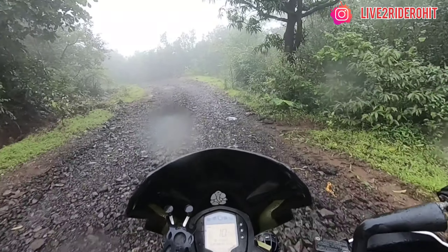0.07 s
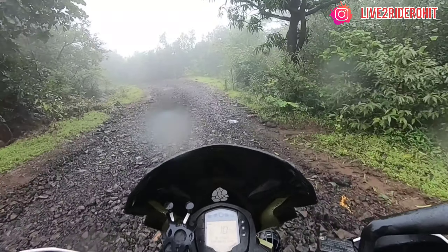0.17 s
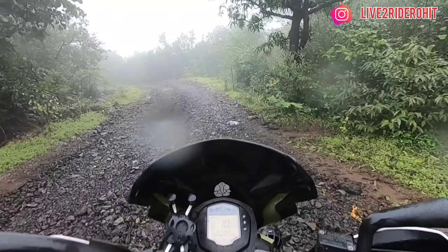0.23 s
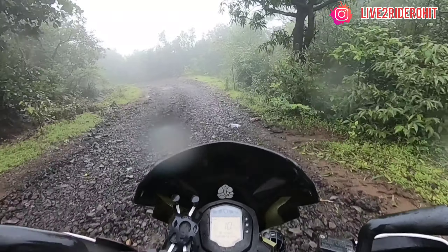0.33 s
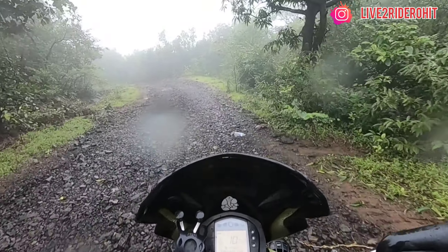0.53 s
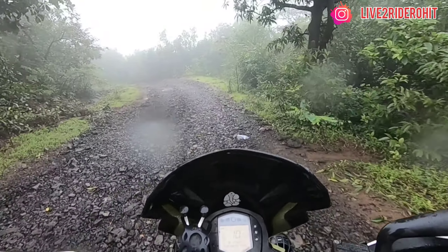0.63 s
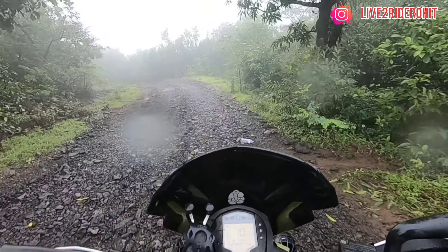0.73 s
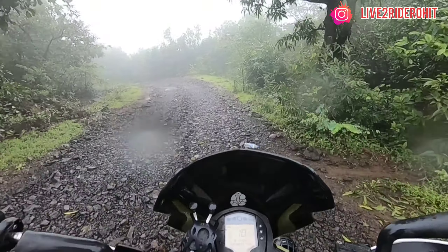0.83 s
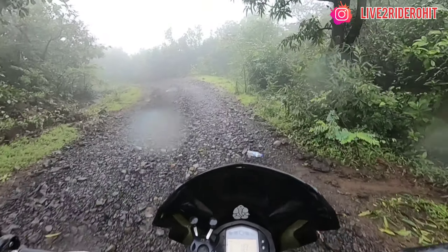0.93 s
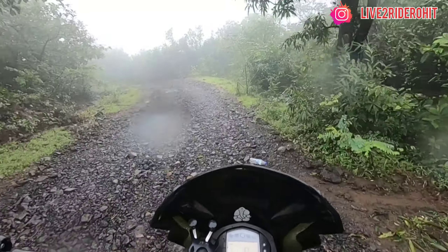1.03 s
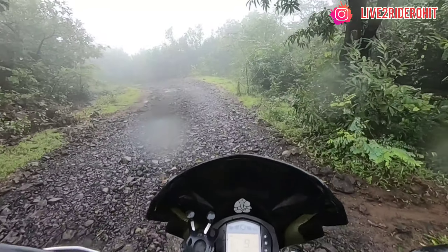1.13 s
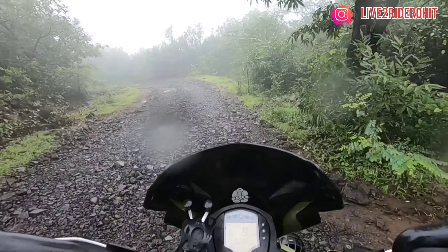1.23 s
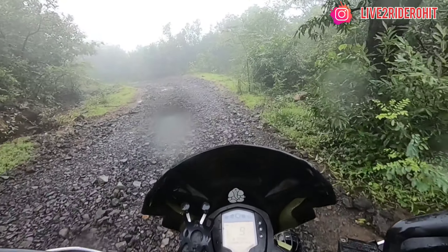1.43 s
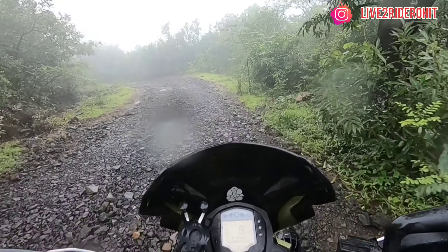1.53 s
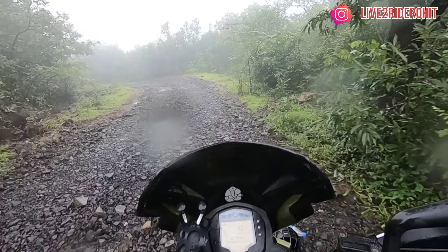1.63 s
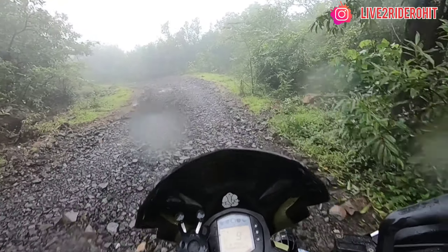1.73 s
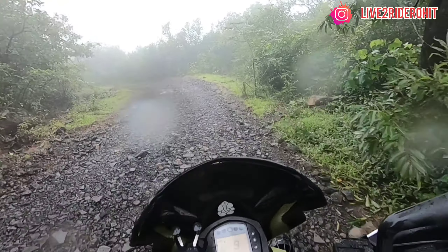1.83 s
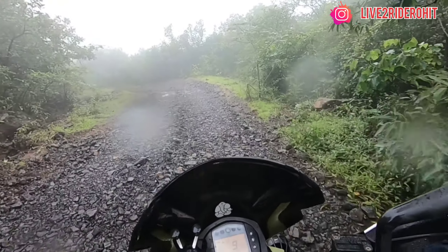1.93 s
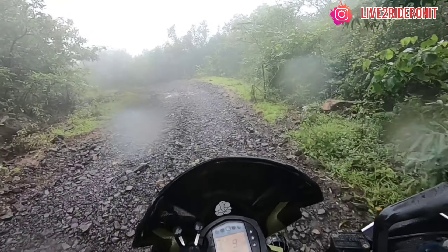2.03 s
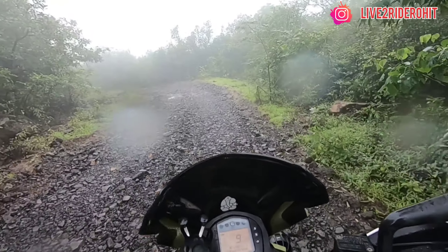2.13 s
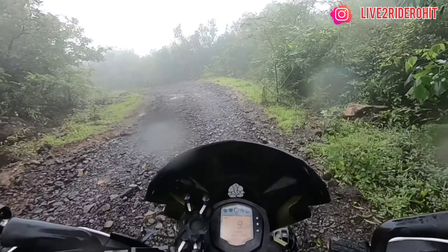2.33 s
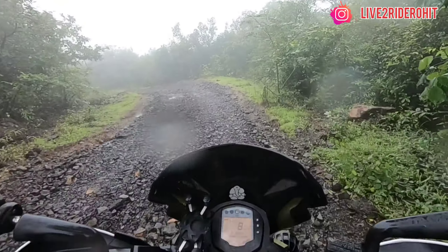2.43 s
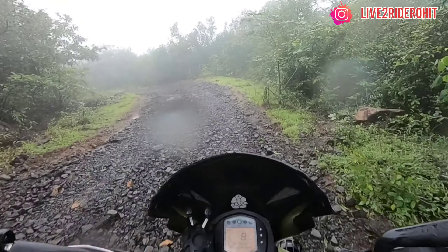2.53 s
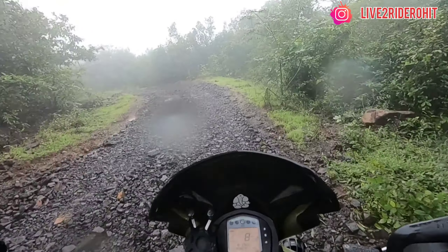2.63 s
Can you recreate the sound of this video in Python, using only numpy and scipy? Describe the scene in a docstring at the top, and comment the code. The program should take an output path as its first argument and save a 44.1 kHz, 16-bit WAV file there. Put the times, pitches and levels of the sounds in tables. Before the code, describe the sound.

Slow motorcycle thumping and clattering across crunching gravel, a short dropout, then a raspy idle that revs up while a louder, deeper single booms nearby.

```python
"""Wet loose stones, from the rider's seat of a single-cylinder motorcycle crawling along.
Each firing knocks, then thumps through the exhaust as a filtered impulse; shaped noise makes gas and valve clatter.
A gear whines in swaying sines, the chain clicks, stones strike the wheels and the engine ticks a few times.
The sound cuts out briefly and returns at a standstill: the engine idles with a metallic rasp, then revs up,
while a second, heavier single booms close by at its own pace."""
import sys
import numpy as np
from scipy import signal
from scipy.fft import rfft, irfft, next_fast_len
from scipy.io import wavfile
from scipy.ndimage import uniform_filter1d, minimum_filter1d, map_coordinates

SR = 44100
rng = np.random.default_rng(int(sys.argv[2]) if len(sys.argv) > 2 else 0)


def unload_wav(signal):
    """Save mono or channel-first audio to the path in sys.argv[1] as 16-bit WAV at rate SR, clipped to [-1, 1]."""
    wavfile.write(
        sys.argv[1],
        SR,
        np.round(np.clip(np.atleast_2d(signal).T, -1, 1) * 32767).astype(np.int16),
    )


N = 268260
TIME = np.arange(N) / SR  # s

# Engine speed rolling, idling, and of the heavier engine. Each row: time in seconds, firings per second.
ROLL_RATE = [(0.0, 17.77), (0.298, 17.21), (0.565, 15.76), (1.025, 18.7), (1.288, 17.26), (1.494, 18.04),
             (1.716, 17.06), (2.503, 16.68), (2.748, 19.1), (3.07, 19.55), (3.391, 16.08), (3.622, 13.15),
             (3.963, 20.99), (4.086, 23.23), (4.259, 20.04), (4.42, 25.11)]
IDLE_RATE = [(4.62, 12.3), (4.8, 12.3), (4.87, 13.71), (5.3, 14.81), (5.68, 13.88), (5.95, 19.58),
             (6.08, 24.12)]
BOOM_RATE = [(4.62, 12.87), (4.97, 12.53), (5.25, 17.71), (5.48, 17.8), (5.78, 14.49), (6.08, 15.63)]
# How hard the throttle works the engine while rolling. Each row: time in seconds, effort in dB.
ROLL_EFFORT = [(0, -1), (.55, -9.5), (1.2, -8.5), (1.42, -2), (1.7, 2.5), (1.97, -4), (2.25, 1), (2.55, -3),
               (2.88, 1.5), (3.15, -2.5), (3.4, 5), (3.8, -2), (4.05, 1.5), (4.4, 0.5)]
# Throttle at a standstill. Each row: time in seconds, effort in dB, exhaust level in dB.
IDLE_DRIVE = [(4.62, -6.5, 2.5), (5.3, -4.5, 5), (5.65, -4, 5), (5.8, -6, 8.5), (6.08, -5.5, 9.5)]
# Pipe echo as the engine labours while rolling. Each row: time in seconds, level in dB.
ROLL_LABOUR = [(0, -35.5), (1.35, -46), (1.7, -34), (2.05, -40), (3.1, -43), (3.38, -26.5), (3.66, -27),
               (3.85, -33.5), (4.4, -39)]
# Gear whine rolling and at a standstill. Each row: time in seconds, level in dB.
ROLL_WHINE = [(0, -53), (.3, -44.5), (.55, -54.5), (1.0, -44.5), (1.6, -41), (1.95, -44), (2.35, -40),
              (3.3, -40), (3.6, -40.5), (4.1, -47.5), (4.4, -38)]
IDLE_WHINE = [(4.62, -49.5), (5.7, -46.5), (5.97, -38), (6.08, -36)]
# Gear mesh tone at a standstill. Each row: time in seconds, pitch in Hz.
IDLE_PITCH = [(4.62, 1003), (5.8, 1100), (5.97, 1304), (6.08, 1294)]
# Drive chain, and the chassis rumbling over the track. Each row: time in seconds, level in dB.
CHAIN_LEVEL = [(0, -58), (.6, -57), (1.1, -53), (1.55, -48.5), (2.05, -56.5), (2.5, -52), (2.9, -48.5),
               (3.35, -54), (4.4, -56.5)]
RUMBLE_LEVEL = [(0, -27.5), (.3, -25.5), (.5, -29.5), (.82, -27), (1.4, -30), (1.75, -26), (2.1, -29.5),
                (3.0, -27), (3.6, -28.5), (4.0, -30.5), (4.4, -31)]
# Looseness of the track under the tyres. Each row: time in seconds, change of the grinding in dB.
GROUND = [(0, 5), (.33, -2.5), (.5, -8), (1.3, -4), (1.65, 4), (1.95, -4), (2.4, 3.5), (3.05, -4.5),
          (3.55, 5), (3.85, 3.5), (4.07, 5.5), (4.4, 3)]
# Stones striking the wheels; from 3.45 to 3.65 s also short engine ticks.
# Each row: time in seconds, relative blow in dB, relative clack in dB.
STRIKES = [(0.150, -15.5, -41), (0.227, -11, -44), (0.248, -16, -41), (0.305, -15.5, -50), (0.367, -9, -33),
           (0.380, -12, -31), (0.667, -16.5, -43), (0.677, -7.5, -30.5), (0.776, -10, -46),
           (0.794, -13, -39.5), (0.820, -17, -55), (1.178, -16, -55), (1.572, -23.5, -27),
           (2.836, -15, -51), (3.044, -15.5, -58), (3.452, -14, -38), (3.522, -26.5, -35),
           (3.576, -12.5, -53), (3.590, -19.5, -33), (3.621, -9, -43), (3.641, -13.5, -46),
           (3.653, -13.5, -36), (4.047, -11, -40.5), (4.067, -10, -33), (4.08, -17.5, -32.5)]
# Strength of the heavier engine. Each row: time in seconds, level in dB.
BOOM_LEVEL = [(4.62, -4), (4.85, -10), (5.2, -9.5), (6.08, -9)]

# Tone of one exhaust pulse: the rider's engine, the heavier one. Each row: frequency in Hz, gain in dB.
ROLL_PIPE = [(18, -28.5), (32, -1.5), (48, -19), (70, 3), (90, 0.5), (120, -1), (165, 0.5), (215, -14.5),
             (260, -16), (400, -25.5), (600, -42.5), (800, -56), (2000, -81)]
BOOM_PIPE = [(18, -32.5), (40, -19), (60, -7.5), (85, -0.5), (122, 0.8), (165, -3), (230, -18.5),
             (320, -27.5), (600, -78), (1200, -100.5)]
# Ring of the silencer. Each row: frequency in Hz, gain in dB.
PIPE_RING = [(120, -28), (240, -11), (310, -10), (390, -1), (455, 2), (495, -13.5), (545, -9), (620, -25),
             (900, -38.5), (3000, -75.5)]
# Turbulent gas after the pulse: the rider's engine, the heavier one. Each row: frequency in Hz, gain in dB.
BARK = [(120, -22.5), (200, 3.5), (320, 2.5), (400, 5), (480, 5), (570, 0.5), (660, -16.5), (900, -25),
        (1500, -35), (3000, -74)]
BOOM_BARK = [(120, -16.5), (220, -1.5), (300, -6), (400, -3.5), (480, -12), (570, -13), (700, -24),
             (1000, -26), (3000, -62.5)]
# Low rumble of the chassis and of the heavier engine's gas. Each row: frequency in Hz, gain in dB.
RUMBLE = [(12, -12), (27, 5), (45, 16), (70, 11.5), (110, 9.5), (160, 8), (210, 7), (320, -13), (700, -69)]
# Outlet of both hollow tones. Each row: frequency in Hz, gain in dB.
MUFFLE = [(15, -12.5), (40, -2.5), (200, 1.5), (400, -18.5), (1200, -59)]
# Combustion knock through the cylinder. Each row: frequency in Hz, gain in dB.
KNOCK = [(400, -22), (900, -1.5), (1450, 9.5), (2000, 1.5), (2500, -2), (3100, -1), (4000, -8),
         (5000, -7.5), (5700, -26), (15000, -50)]
# Engine casing while rolling and while idling. Each row: frequency in Hz, gain in dB.
ROLL_CASE = [(400, -26), (750, 0.5), (1300, 7), (1600, 0.5), (1900, -0.5), (2500, -0.5), (3050, 1.5),
             (3800, -2.5), (5100, -3.5), (5700, -16.5), (7300, -26.5), (10000, -34), (15000, -36)]
IDLE_CASE = [(400, -11), (750, 11), (1350, 7.5), (1800, 5.5), (2200, 2.5), (2800, 5), (3500, 2.5),
             (4550, 2), (5100, -17.5), (6100, -12), (7500, -21.5), (10000, -31), (15000, -44.5)]
# Low body of a strike, and its bright clack. Each row: frequency in Hz, gain in dB.
FRAME = [(25, -13.5), (70, 1.5), (140, 5), (250, -1), (420, -10), (600, -26.5), (1200, -47), (5000, -99)]
CLACK = [(200, -10), (550, 5.5), (850, -3.5), (1400, -10.5), (2000, -25), (2500, -32.5), (5000, -25.5),
         (6000, -43.5), (12000, -70)]
# Final tone of the silencer's song, the rasp, the gears and the chain. Each row: frequency in Hz, gain in dB.
SING_TONE = [(150, -22.5), (380, -2.0), (480, 0.0), (560, -7), (700, -26), (3000, -61.5)]
RASP_TONE = [(400, -2), (800, -0.5), (4600, 1.5), (5300, -17.5), (9000, -35.5)]
GEAR_TONE = [(500, -13), (950, 3.5), (1600, -2.5), (2500, -8.0), (7000, -41.5)]
CHAIN_TONE = [(500, -13.5), (1400, 2.5), (5150, -1.5), (5600, -20), (8000, -23.5), (15000, -29)]

# Silencer modes that outlast the thump. Each row: frequency in Hz, width in Hz, relative level in dB.
SILENCER = [(404, 32, -8.5), (450.4, 18.4, 5), (536, 44, -10.5)]
# Airbox hum between firings, and the pipe's echo. Each row: frequency in Hz, width in Hz, relative level in dB.
AIRBOX = [(69.5, 12, 0)]
PIPE_ECHO = [(145, 50, 0)]
# Metallic rasp at idle. Each row: frequency in Hz, width in Hz, relative level in dB.
RASP_MODES = [(900, 120, 4.5), (1840, 190, 1.5), (2720, 290, 3), (4470, 500, -3)]
# Gearbox driven by the mesh, and shaken by loose teeth.
# Each row: frequency in Hz, width in Hz, relative level in dB.
GEARBOX = [(1060, 60, 0.5), (1168, 18, 5), (1310, 18, -4.5), (1534, 80, -19)]
GEAR_RATTLE = [(1038, 76, -0.5), (1180, 74, 0), (1340, 81, -8)]
# Ring of the chain's links. Each row: frequency in Hz, width in Hz, relative level in dB.
CHAIN = [(1603, 60, -2), (2140, 160, -6), (3095, 230, -2), (4685, 570, -3.5)]

ROLL_FIRST, IDLE_FIRST, BOOM_FIRST = 0.025, 4.704, 4.682  # first firing of each (s)
CUT, RETURN, FULL = 4.425, 4.62, 4.695  # silence begins, sound returns, full level (s)
CRUISE_RATE = 16.03  # firings per s at which the levels below hold

# Exhaust layers: level at zero effort (dB), and dB gained per dB of effort
THUMP_DB, THUMP_GROWS = -25, 0.23
RING_DB, RING_GROWS = -36.5, 0.66
SING_DB, SING_GROWS = -35.5, 1.58
BARK_DB, BARK_GROWS = -37, 0.46
AIRBOX_DB, AIRBOX_GROWS = -31.5, 0.58
THUMP_SAG_DB, AIRBOX_SAG_DB = 0.5, 1.2  # dB lost per extra firing a second
RING_LEAD = 0.03935  # cycles by which the silencer ring's impulses are advanced
RING_BEND_S = 0.00035  # depth of the delay sway that bends the silencer's pitch
PIPE_ECHO_S = 0.0075  # round trip along the pipe
IDLE_LABOUR_DB = -33.5  # pipe echo at a standstill, before the exhaust level

# Valve clatter: level (dB), dB per dB of effort (rolling only), dB per extra firing a second
CLATTER_DB, CLATTER_GROWS, CLATTER_RISE_DB = -44, 0.12, 0.3
IDLE_CLATTER_DB, IDLE_CLATTER_RISE_DB = -39, 0.52
ROLL_KNOCK_DB, IDLE_KNOCK_DB = -50, -47.5
KNOCK_LUG_DB = 0.5  # dB gained per firing a second lost, rolling only
RASP_DB, RASP_UNTIL_S, RASP_FADE_DB_PER_S = -37, 5.05, 56  # the rasp holds for a moment, then dies
RASP_CLATTER_DB, RASP_KNOCK_DB = 3, 3  # extra clatter and knock while it rasps
MESH_PER_FIRING, MESH_TOP_HZ = 61.5, 1212  # the rolling gear tone follows engine speed up to this pitch
SECOND_MESH, SECOND_MESH_DB = 0.96, -16  # second gear pair: pitch ratio, level against the first (dB)
GEAR_DIRECT_DB = 3  # gear tone that bypasses the gearbox, against the resonant share

SCRUB_DB = -42.5  # tyres grinding stones on average ground
BOOM_RUMBLE_DB, BOOM_BARK_DB = -14, -21  # the heavier engine's gas, against its boom
TOP_HZ = 15700  # band limit


def amp(db):
    """Decibels to gain."""
    return 10 ** (np.asarray(db) / 20)


def unit(x):
    """Scale to rms 1 over the time in which it sounds."""
    sounding = uniform_filter1d(np.abs(x), size=4410) > np.abs(x).max() / 1000
    return x / np.sqrt(np.mean(x[sounding] ** 2) + 1e-20)


def curves(rows):
    """One value per sample for each column after the time."""
    s, *cols = np.transpose(rows)
    return [np.interp(TIME, s, c) for c in cols]


def wobble(rate):
    """A smooth random curve, rate knots a second."""
    knots = rng.standard_normal(int(N * rate / SR) + 4)
    return map_coordinates(knots, [TIME * rate])


def noise():
    """Fresh white noise."""
    return rng.standard_normal(N)


def colour(x, points):
    """Causal, minimum-phase filter whose gain follows (Hz, dB) points."""
    size = 2 * next_fast_len(N // 2 + SR // 4)
    hz, db = np.transpose(points)
    gain = amp(np.interp(np.log(np.fft.rfftfreq(size, 1 / SR) + 1), np.log(hz), db))
    # folding the cepstrum forward puts all the energy after the impulse
    cepstrum = irfft(np.log(gain))
    cepstrum[1:size // 2] *= 2
    cepstrum[size // 2 + 1:] = 0
    return irfft(rfft(x, size) * np.exp(rfft(cepstrum)))[:N]


def resonate(x, modes):
    """Ring x through (Hz, width, dB) resonances."""
    f = np.fft.rfftfreq(N, 1 / SR)
    response = sum(amp(db) * 1j * f * w / (c * c - f * f + 1j * f * w) for c, w, db in modes)
    return irfft(rfft(x) * response, N)


def crank(rate_rows, first):
    """Engine cycles counted from the first firing."""
    cycles = np.cumsum(curves(rate_rows)[0]) / SR
    return cycles - np.interp(first, TIME, cycles)


def firings(cycles, scatter_db):
    """One impulse per cycle, each burn a little different."""
    at = np.flatnonzero(np.diff(np.floor(cycles)) > 0)
    train = np.zeros(N)
    train[at] = amp(scatter_db * rng.standard_normal(len(at)))
    return train


def burst(cycles, angle, length, rise, scatter_db):
    """An envelope that swells from one angle of each cycle over rise cycles and dies over length cycles."""
    turn = cycles - angle
    index = np.floor(turn - np.floor(turn[0])).astype(int)
    size = amp(scatter_db * rng.standard_normal(index[-1] + 1))
    phase = turn % 1
    shape = np.exp(-phase / length) * (1 - np.exp(-(phase / rise) ** 2))
    return size[index] * shape / shape.max()


def gravel(rate, spread_db):
    """Tiny random clicks, as of grinding stones or chain links."""
    hits = rng.random(N) < rate / SR
    return unit(hits * np.sign(noise()) * amp(spread_db * np.clip(noise(), -2, 2)))


def rolling():
    """Light throttle: crisp thumps, clatter, whine and gravel, led by engine speed, effort and ground."""
    cycles = crank(ROLL_RATE, ROLL_FIRST)
    rate, effort = curves(ROLL_RATE)[0], curves(ROLL_EFFORT)[0]
    revs = rate - CRUISE_RATE
    mesh_hz = np.minimum(MESH_PER_FIRING * rate, MESH_TOP_HZ)
    clatter_db = CLATTER_DB + CLATTER_GROWS * effort + CLATTER_RISE_DB * revs
    mix = exhaust(cycles, revs, effort, curves(ROLL_LABOUR)[0])
    mix += amp(clatter_db) * rolling_valves(cycles)
    mix += amp(ROLL_KNOCK_DB - KNOCK_LUG_DB * revs) * knock(cycles, angle=0.71, length=0.11)
    mix += amp(curves(ROLL_WHINE)[0]) * gear_whine(cycles, mesh_hz, ripple=0.5, blur=0.12, rattle=1.3)
    mix += amp(curves(CHAIN_LEVEL)[0]) * chain(cycles)
    mix += amp(curves(RUMBLE_LEVEL)[0]) * chassis_rumble(cycles)
    return mix + amp(SCRUB_DB + curves(GROUND)[0]) * tyre_scrub()


def idling():
    """The engine idles with a dry metallic rasp on each valve stroke, then picks up speed."""
    cycles = crank(IDLE_RATE, IDLE_FIRST)
    revs = curves(IDLE_RATE)[0] - CRUISE_RATE
    effort, level_db = curves(IDLE_DRIVE)
    rasping = amp(-RASP_FADE_DB_PER_S * np.maximum(TIME - RASP_UNTIL_S, 0))  # 1 while it holds
    strokes = 0.44 * burst(cycles, 0.7, 0.15, rise=0.04, scatter_db=4.0)
    strokes += 0.12 * burst(cycles, 0.11, 0.12, rise=0.064, scatter_db=5.0)
    clatter_db = IDLE_CLATTER_DB + IDLE_CLATTER_RISE_DB * revs + RASP_CLATTER_DB * rasping
    knock_db = IDLE_KNOCK_DB + RASP_KNOCK_DB * rasping
    whine = gear_whine(cycles, curves(IDLE_PITCH)[0], ripple=0.69, blur=0.2, rattle=0.7)
    mix = amp(level_db) * exhaust(cycles, revs, effort, IDLE_LABOUR_DB)
    mix += amp(clatter_db) * idling_valves(strokes, rasping)
    mix += amp(RASP_DB) * rasping * metallic_rasp(strokes)
    mix += amp(knock_db) * knock(cycles, angle=0.66, length=0.081)
    return mix + amp(curves(IDLE_WHINE)[0]) * whine


def exhaust(cycles, revs, effort, labour_db):
    """Each firing thumps through the pipe and rings the silencer, which sings on under load; gas puffs along."""
    pulses = firings(cycles, scatter_db=1.1)
    ring_pulses = firings(cycles + RING_LEAD, scatter_db=1.0)
    thump = -unit(colour(pulses, ROLL_PIPE))
    ring = -unit(colour(ring_pulses, PIPE_RING))
    sing = unit(colour(resonate(pulses, SILENCER), SING_TONE))
    puffs = 0.37 + burst(cycles, -0.098, 0.55, rise=0.077, scatter_db=0.1)
    gas = unit(colour(noise() * puffs, BARK))
    silencer = amp(RING_DB + RING_GROWS * effort) * ring
    silencer += amp(SING_DB + SING_GROWS * effort) * sing
    silencer += amp(BARK_DB + BARK_GROWS * effort) * gas
    # faster running means smaller gulps of gas, so a lighter thump
    thump_db = THUMP_DB + THUMP_GROWS * effort - THUMP_SAG_DB * revs
    return amp(thump_db) * thump + bend(silencer, cycles) + hollow_tones(pulses, revs, effort, labour_db)


def bend(x, cycles):
    """Hot gas passing through the pipe lifts its pitch during each stroke; it sinks back before the next."""
    delay = RING_BEND_S * np.sin(2 * np.pi * (cycles + 0.0096))
    return map_coordinates(x, [(TIME - delay) * SR], order=3)


def hollow_tones(pulses, revs, effort, labour_db):
    """The airbox hums on between firings, less at high speed, and each pulse comes back along the pipe."""
    hum = -unit(colour(resonate(pulses, AIRBOX), MUFFLE))
    echo = -unit(colour(resonate(pulses, PIPE_ECHO), MUFFLE))
    echo = np.interp(TIME - PIPE_ECHO_S, TIME, echo)
    hum_db = AIRBOX_DB + AIRBOX_GROWS * effort - AIRBOX_SAG_DB * np.maximum(revs, 0)
    return amp(hum_db) * hum + amp(labour_db) * echo


def knock(cycles, angle, length):
    """Each burn raps the cylinder about a third of a cycle before the exhaust thump."""
    rap = burst(cycles, angle, length, rise=0.035, scatter_db=1.2)
    return unit(colour(noise() * rap, KNOCK))


def rolling_valves(cycles):
    """Valves clatter in the casing, hardest as they shut late in the cycle, well after the exhaust pulse."""
    valves = 0.56 + 0.5 * burst(cycles, 0.63, 0.22, rise=0.11, scatter_db=1.5)
    valves += 0.27 * burst(cycles, 0.08, 0.2, rise=0.07, scatter_db=2)
    return unit(colour(noise() * valves * amp(0.61 * wobble(420)), ROLL_CASE))


def idling_valves(strokes, rasping):
    """Valve strokes hiss through the casing and stand out more sharply while the engine rasps."""
    valves = 0.72 + (0.3 + 1.0 * rasping) * strokes
    return unit(colour(noise() * valves, IDLE_CASE))


def metallic_rasp(strokes):
    """Noise gusts on the valve strokes, flickers and rings a few metallic resonances."""
    gusts = 0.36 + 1.4 * strokes
    rasp = resonate(noise() * gusts * amp(2.2 * wobble(120)), RASP_MODES)
    return unit(colour(rasp, RASP_TONE))


def gear_whine(cycles, mesh_hz, ripple, blur, rattle):
    """The mesh tones sway with the crank and bite three times a cycle; loose teeth rattle the gearbox too."""
    # ripple and blur sway the phase, in turns of the mesh tone
    teeth = np.cumsum(mesh_hz) / SR + ripple * np.sin(2 * np.pi * cycles) + blur * wobble(160)
    backlash = 0.3 + 0.65 * burst(cycles, 0.66, 0.15, rise=0.12, scatter_db=0.0)
    backlash += 0.33 * burst(cycles, 0.038, 0.077, rise=0.057, scatter_db=2)
    backlash += 0.28 * burst(cycles, 0.23, 0.12, rise=0.14, scatter_db=2.5)
    tones = np.sin(2 * np.pi * teeth) + amp(SECOND_MESH_DB) * np.sin(2 * np.pi * SECOND_MESH * teeth)
    mesh = backlash * tones * amp(1.5 * wobble(150))
    drive = unit(resonate(mesh, GEARBOX)) + amp(GEAR_DIRECT_DB) * unit(mesh)
    drive += rattle * unit(resonate(backlash * noise(), GEAR_RATTLE))
    return unit(colour(drive, GEAR_TONE))


def chain(cycles):
    """Links click over the sprockets, hardest when a power stroke snatches the chain."""
    snatch = 0.5 + burst(cycles, 0.68, 0.38, rise=0.08, scatter_db=2)
    snatch += 0.4 * burst(cycles, 0.41, 0.1, rise=0.05, scatter_db=2)
    links = resonate(gravel(rate=800, spread_db=2.5) * snatch, CHAIN)
    return unit(colour(links, CHAIN_TONE))


def stones_and_ticks():
    """Each stone or engine tick is a single shove and a shudder of low noise, with a brighter, shorter clack."""
    shoves, thuds, clacks = np.zeros((3, N))
    for s, db, clack_db in STRIKES:
        age = np.maximum(TIME - s, 0)
        shoves[round(s * SR)] = amp(db)
        thuds += amp(db) * (age > 0) * np.exp(-age / 0.016)
        clacks += amp(clack_db) * (age > 0) * np.exp(-age / 0.008)
    frame = colour(amp(9.0) * thuds * noise() - amp(36.5) * shoves, FRAME)
    return frame + amp(19.0) * colour(clacks * noise(), CLACK)


def chassis_rumble(cycles):
    """The chassis rumbles over the track as low noise, swelling a little with each firing."""
    swell = 3.0 + burst(cycles, -0.049, 0.087, rise=0.057, scatter_db=3.5)
    return unit(colour(noise() * swell, RUMBLE))


def tyre_scrub():
    """Tyres grind the stones together: a dense patter of tiny clacks."""
    return unit(colour(gravel(rate=2500, spread_db=6.5), CLACK))


def big_single():
    """A heavier engine close by, out of step with the rider's own: round booms, each with a puff of gas."""
    cycles = crank(BOOM_RATE, BOOM_FIRST)
    boom = -unit(colour(firings(cycles, scatter_db=2.1), BOOM_PIPE))
    puffs = 0.31 + burst(cycles, 0, 0.72, rise=0.1, scatter_db=3.5)
    rumble = unit(colour(noise() * puffs, RUMBLE))
    bark = unit(colour(noise() * puffs, BOOM_BARK))
    return amp(curves(BOOM_LEVEL)[0]) * (boom + amp(BOOM_RUMBLE_DB) * rumble + amp(BOOM_BARK_DB) * bark)


def scene():
    """The rolling stretch stops dead; after a short silence the two standing engines fade in."""
    fade = np.clip((TIME - RETURN) / (FULL - RETURN), 0, 1) ** 1.43
    on_the_move = (rolling() + stones_and_ticks()) * (TIME < CUT)
    standing = (idling() + big_single()) * fade
    return (on_the_move + standing)[None]


def record(dry):
    """A fast limiter holds the booms under full scale; a steep low-pass then cuts the top."""
    needed = np.minimum(1, 0.95 / (np.abs(dry) + 1e-9))
    gain = uniform_filter1d(minimum_filter1d(needed, size=441), size=441)  # 10 ms windows
    low_pass = signal.butter(16, TOP_HZ, fs=SR, output="sos")
    return signal.sosfilt(low_pass, dry * gain)


dry = scene()
out = record(dry)
unload_wav(out)
```